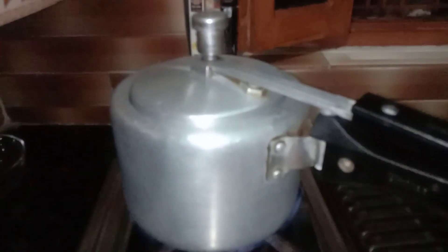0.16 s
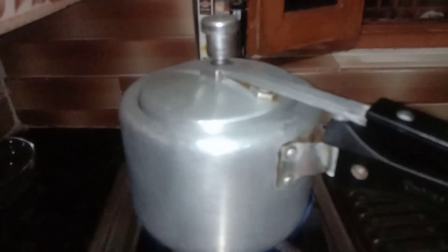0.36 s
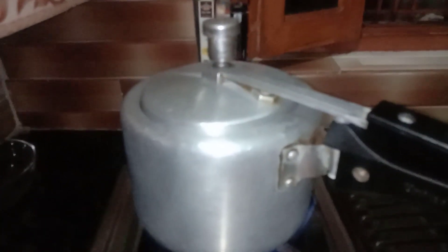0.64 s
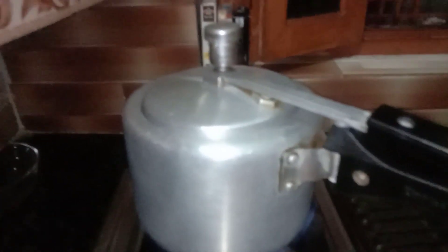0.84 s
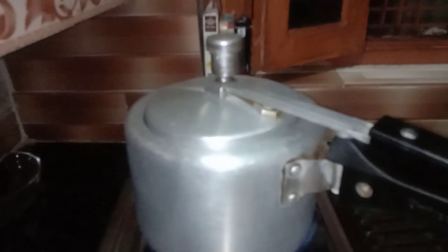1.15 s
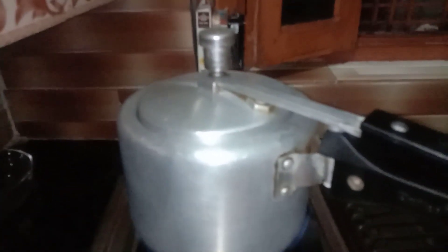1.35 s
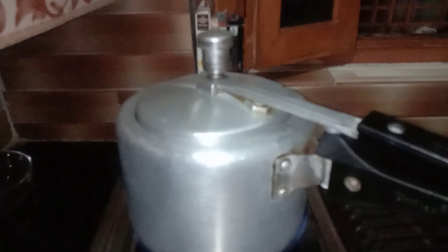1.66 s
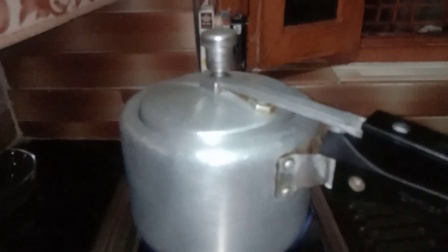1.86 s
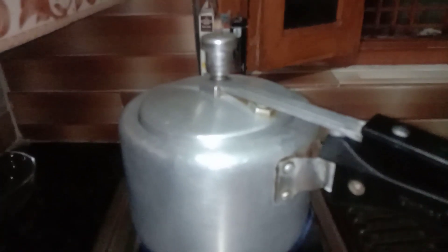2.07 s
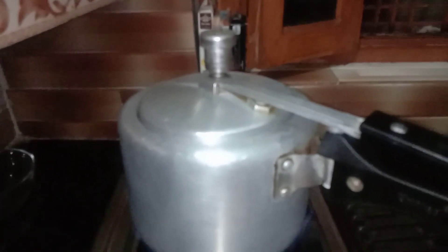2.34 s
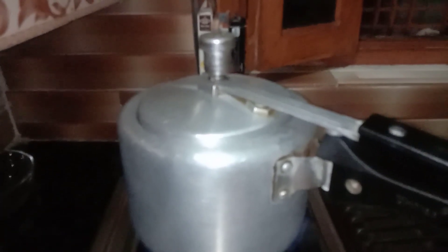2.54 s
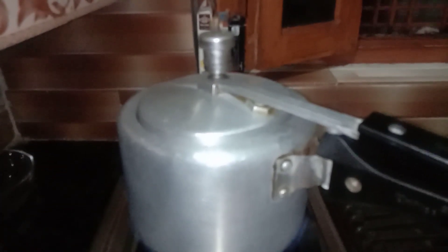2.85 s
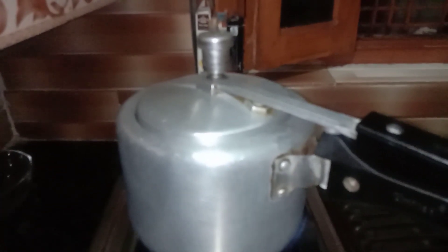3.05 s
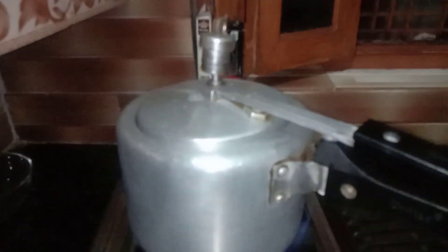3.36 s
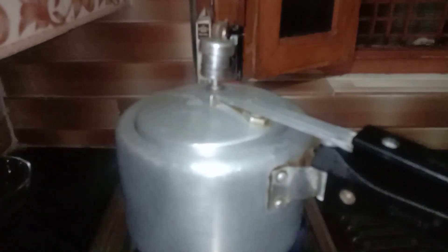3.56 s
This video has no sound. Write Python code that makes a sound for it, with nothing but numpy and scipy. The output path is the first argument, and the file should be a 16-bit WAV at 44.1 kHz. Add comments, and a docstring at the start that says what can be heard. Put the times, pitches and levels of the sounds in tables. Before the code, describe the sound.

A pressure cooker hisses steadily, close by in a small kitchen, with a faint gas flame fluttering underneath. A louder jet of steam then blasts out briefly and ends in a few wet, gurgling spurts.

```python
"""A pressure cooker vents on a gas ring in a small tiled kitchen, close by, in mono.
Wet steam first leaks past the weight valve with a sputtering hiss; the flame flutters below.
The weight lifts: a loud turbulent jet blasts out with low gusts and spits of water.
It sinks back in a few wet spurts while water gurgles in the vent."""
import sys
import numpy as np
from scipy import signal
from scipy.fft import rfft, irfft
from scipy.io import wavfile

SR = 44100
rng = np.random.default_rng(int(sys.argv[2]) if len(sys.argv) > 2 else 0)


def generate_wav(signal):
    """Clip the signal to [-1, 1] and save it as 16-bit WAV at the path in sys.argv[1]."""
    frames = np.transpose(np.atleast_2d(signal))
    scaled = np.clip(frames, -1, 1) * 32767
    pcm = np.round(scaled).astype(np.int16)
    wavfile.write(sys.argv[1], SR, pcm)


N = 163170

# Noise spectra, shape only: freq_hz, density_db
FLAME_SPECTRUM = [(25, -32), (55, -21), (85, -1.5), (115, 5.5), (155, -19), (200, -13.5), (280, -38.5),
                  (800, -40)]
LEAK_SPECTRUM = [(30, -36), (150, -18.5), (250, -26), (600, -27), (1600, -21), (3500, -12.5), (5500, 1),
                 (8000, -0.5), (9500, -6.5), (11500, -12.5), (13000, -15.5), (15500, -21.5)]
GURGLE_SPECTRUM = [(200, -26), (420, -3), (530, -1), (720, -9), (870, 2), (1100, -2), (1500, 1), (2000, -5),
                   (3200, -1), (6000, -15)]
SPURT_SPECTRUM = [(150, -42), (280, -27.5), (450, -37), (900, -12), (1600, -10.5), (3500, -0.5),
                  (5600, 6.5), (8000, -1.5), (9500, -2.5), (11500, -14), (13000, -23), (15500, -40)]
GUST_SPECTRUM = [(25, -32), (45, -25), (75, 1.5), (120, 0), (250, -5), (450, -12.5), (1200, -53)]
SPIT_SPECTRUM = [(40, -10), (150, -3), (400, -1), (1200, -2), (3000, -16), (12000, -31)]
JET_SPECTRUM = [(30, -36), (90, -9), (250, -8), (600, -5.5), (1600, -6.5), (3500, -3.5), (4500, -1),
                (5700, -2.5), (7700, -0.04), (9500, -5.5), (11700, -4.5), (12600, -13.5), (15500, -21.5)]
# Flame puffs, vent gurgles, wet spurts, jet gusts: start_s, hold_s, level_db
FLAME_PUFFS = [(.165, 0.012, -44), (.45, 0.12, -54), (.72, 0.085, -56), (.935, 0.041, -47.5),
               (1.065, 0.063, -50), (1.15, 0.11, -45), (1.395, 0.17, -50), (1.615, 0.044, -44),
               (1.725, .1, -52), (1.855, 0.054, -44.5), (1.96, 0.05, -47), (2.067, 0.049, -44.5),
               (2.315, 0.13, -43.5), (2.525, 0.056, -51.5)]
VENT_GURGLES = [(3.47, 0.047, -34.5), (3.515, 0.042, -31)]
WET_SPURTS = [(3.455, .05, -25.5), (3.497, 0.028, -23), (3.522, 0.027, -19), (3.562, .012, -22.5),
              (3.587, 0.0053, -20), (3.6, 0.035, -21.5)]
JET_GUSTS = [(2.845, 0.069, -30), (2.915, 0.047, -30), (2.99, 0.051, -30), (3.075, 0.023, -27),
             (3.165, 0.053, -29.5), (3.245, 0.055, -30), (3.31, 0.054, -33.5)]
# Water drops: start_s, level_db
WATER_SPITS = [(2.851, -24), (2.919, -17), (2.951, -18.5), (3.271, -22)]
# Steam envelopes: time_s, level_db
LEAK_ENVELOPE = [(0, -23.5), (.15, -24.5), (.33, -23.5), (.63, -24.5), (.85, -23.5), (1.05, -24.5),
                 (1.28, -23), (1.36, -25), (1.56, -22), (1.76, -24.5), (1.92, -22.5), (2.1, -22.5),
                 (2.18, -24), (2.38, -22.5), (2.54, -24.5), (2.8, -22.5), (3.4, -21), (3.7, -30)]
JET_ENVELOPE = [(2.838, -47), (2.848, -16.5), (3.04, -17.5), (3.14, -18), (3.29, -18.5), (3.39, -19),
                (3.43, -28), (3.47, -22), (3.6, -39), (3.66, -38), (3.7, -30)]
# Steam colour, including valve and pot resonances: centre_hz, width_hz, gain_db
STEAM_RESONANCES = [(510, 90, 3.5), (890, 117, 4.5), (1256, 117, 11.5), (1573, 180, 3), (1974, 50, 2.5),
                    (2520, 57, 2), (2630, 83, -4.5), (2850, 180, 1.5), (3400, 59, -6.5), (4020, 68, -2),
                    (4260, 116, 4.5), (4500, 100, 1), (5133, 127, 8), (5180, 56, -9.5), (5530, 157, 8.5),
                    (5760, 180, 6.5), (6005, 147, 9.5), (6350, 340, 6.5), (7045, 310, 4), (7538, 550, 9),
                    (8720, 290, -7), (15250, 1400, 19)]
# Steam flicker, independent per octave: freq_hz, depth_db
STEAM_FLICKER = [(350, 1.7), (1400, 1.6), (5000, 0.51), (15000, 1.05)]


def undb(db):
    return 10 ** (np.asarray(db) / 20)


def unit_rms(x):
    return x / np.sqrt(np.mean(x ** 2))


def times_s():
    return np.arange(N) / SR


def freqs_hz():
    return np.maximum(np.arange(N // 2 + 1) * SR / N, 1)


def envelope(rows):
    """Gain through (time_s, level_db) points."""
    return undb(np.interp(times_s(), *np.array(rows).T))


def shaped_noise(bin_gain):
    """White noise weighted per frequency, rms 1."""
    return unit_rms(irfft(rfft(rng.standard_normal(N)) * bin_gain, N))


def noise(spectrum):
    """Noise through (freq_hz, density_db) points, rms 1."""
    freq_hz, density_db = np.array(spectrum).T
    return shaped_noise(undb(np.interp(np.log(freqs_hz()), np.log(freq_hz), density_db)))


def drift(rate_hz):
    """Smooth random motion, rms 1."""
    return shaped_noise(np.exp(-2 * (freqs_hz() / rate_hz) ** 2))


def bursts(rows, attack_s, release_s):
    """Attack-hold-release gains, summed in power."""
    t = times_s()
    power = np.zeros(N)
    for start_s, hold_s, level_db in rows:
        attack = np.clip((t - start_s) / attack_s, 0, 1)
        release = np.exp(-np.maximum(t - start_s - hold_s, 0) / release_s)
        power += (undb(level_db) * attack * release) ** 2
    return np.sqrt(power)


def kitchen(direct, t60_s=0.3, gap_s=0.003, wet_db=-10.5):
    """Dense, short reflections off the tiles."""
    t = times_s()
    tail = rng.standard_normal(N) * (t > gap_s) * np.exp(-np.log(1000) * t / t60_s)
    wet = signal.fftconvolve(direct, tail / np.linalg.norm(tail))[:N]
    return (direct + undb(wet_db) * wet) / np.hypot(1, undb(wet_db))


def flame(floor_db=-62):
    """Low burner rumble, flaring in soft puffs."""
    puffs = bursts(FLAME_PUFFS, attack_s=0.0064, release_s=0.025)
    return np.hypot(undb(floor_db), puffs) * noise(FLAME_SPECTRUM)


def pot_note(pitch_hz=1260, half_width_hz=31, level_db=-56):
    """Hollow note of the pot, sustained by the leak."""
    detuning = (freqs_hz() - pitch_hz) / half_width_hz
    return undb(level_db) * shaped_noise(1 / (1 + detuning ** 2))


def steam(spectrum, sputter_db, wobble_db, sputter_hz=2100, wobble_hz=51, flicker_hz=39):
    """Resonant turbulence, rms 1. Water in the gap chops it; the rocking weight sways it."""
    f = freqs_hz()
    turbulence = rfft(noise(spectrum))
    octave = np.clip(np.log2(f / SR) + 7, 0, 6)
    centres_hz = SR / 2 ** np.arange(7, 0, -1)
    flow = np.zeros(N)
    for k, depth_db in enumerate(np.interp(centres_hz, *np.array(STEAM_FLICKER).T)):
        band = irfft(turbulence * np.maximum(1 - abs(octave - k), 0), N)
        flow += band * undb(depth_db * drift(flicker_hz))
    flow *= undb(sputter_db * drift(sputter_hz) + wobble_db * drift(wobble_hz))
    colour_db = sum(gain_db * np.exp(-2 * ((f - centre_hz) / width_hz) ** 2)
                    for centre_hz, width_hz, gain_db in STEAM_RESONANCES)
    return unit_rms(irfft(rfft(flow) * undb(colour_db), N))


def leak():
    """Steam squeezes past the seated weight."""
    return envelope(LEAK_ENVELOPE) * steam(LEAK_SPECTRUM, sputter_db=0.02, wobble_db=1.0)


def gurgles():
    """Water rises in the vent as the jet dies: hollow midrange."""
    return bursts(VENT_GURGLES, attack_s=0.006, release_s=0.015) * noise(GURGLE_SPECTRUM)


def spurts():
    """The weight bobs on the vent before it seats."""
    gain = bursts(WET_SPURTS, attack_s=0.0025, release_s=0.027)
    return gain * steam(SPURT_SPECTRUM, sputter_db=1.5, wobble_db=-2.2)


def spits(decay_s=0.0025):
    """Water drops thrown through the vent."""
    t = times_s()
    gain = sum(undb(level_db) * (t >= start_s) * np.exp(-abs(t - start_s) / decay_s)
               for start_s, level_db in WATER_SPITS)
    return gain * noise(SPIT_SPECTRUM)


def gusts():
    """The jet buffets the air: low rumble."""
    return bursts(JET_GUSTS, attack_s=0.0074, release_s=0.019) * noise(GUST_SPECTRUM)


def jet():
    """Steam blasts from the open vent under the lifted weight."""
    return envelope(JET_ENVELOPE) * steam(JET_SPECTRUM, sputter_db=0.5, wobble_db=0.46)


def scene():
    """Cooker with reflections, flame without; two identical channels."""
    cooker = pot_note() + leak() + jet() + gusts() + spits() + spurts() + gurgles()
    mono = kitchen(cooker) + flame()
    return np.array([mono, mono])


def record(dry):
    """Steep elliptic low-pass."""
    cutoff_hz = 15520
    return signal.sosfilt(signal.ellip(12, 0.1, 80, cutoff_hz, fs=SR, output="sos"), dry)


dry = scene()
out = record(dry)
generate_wav(out)
```